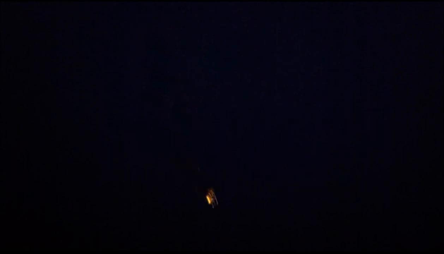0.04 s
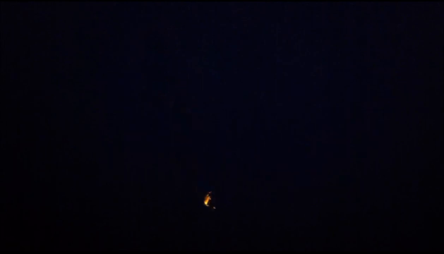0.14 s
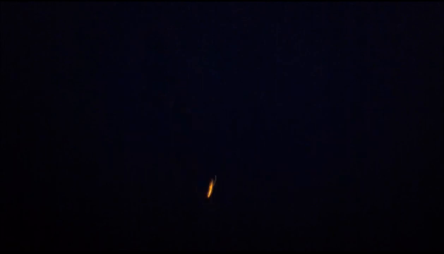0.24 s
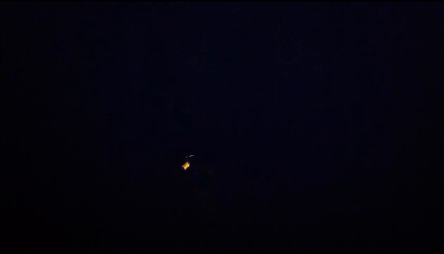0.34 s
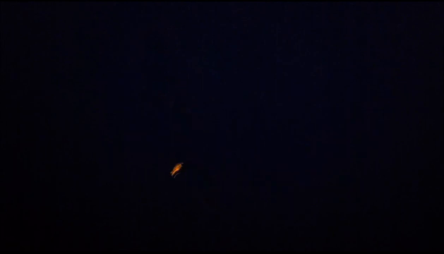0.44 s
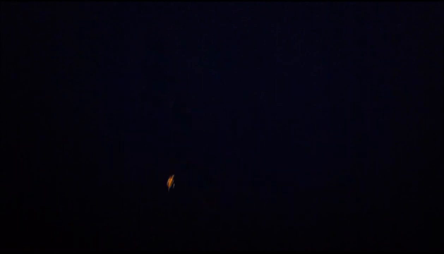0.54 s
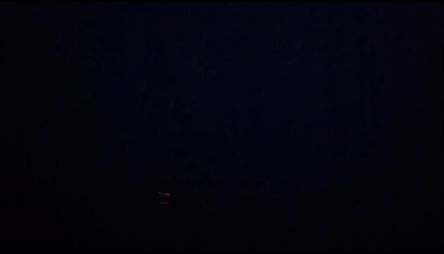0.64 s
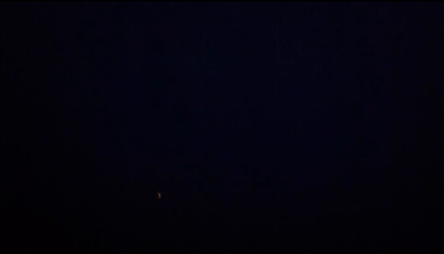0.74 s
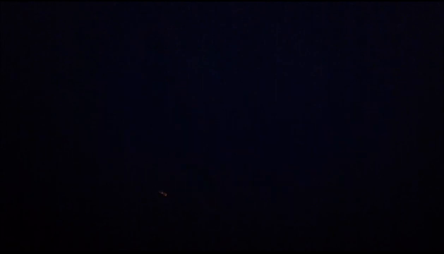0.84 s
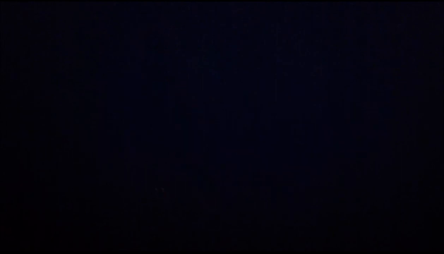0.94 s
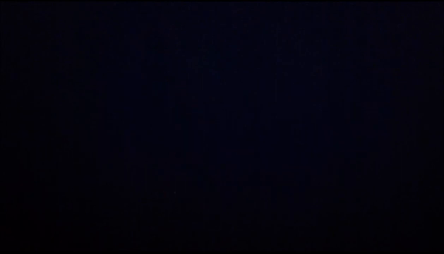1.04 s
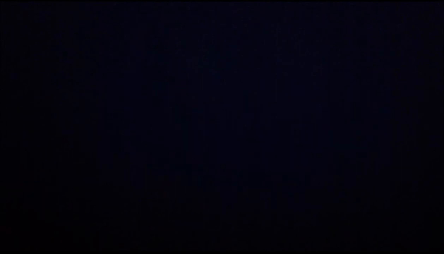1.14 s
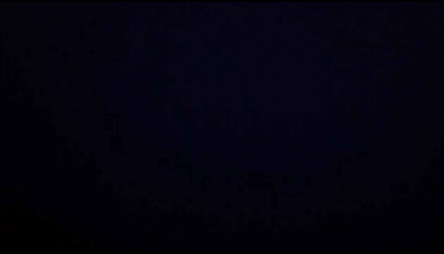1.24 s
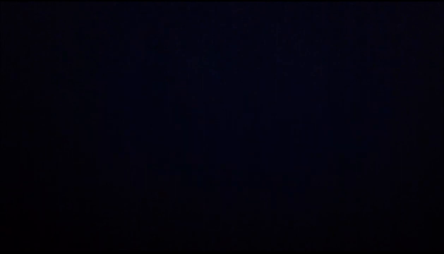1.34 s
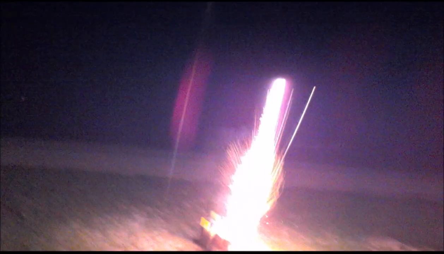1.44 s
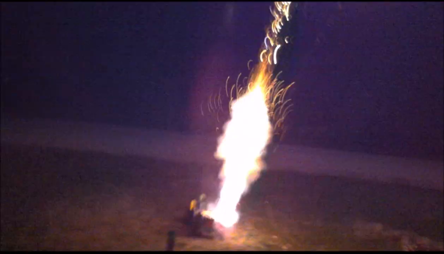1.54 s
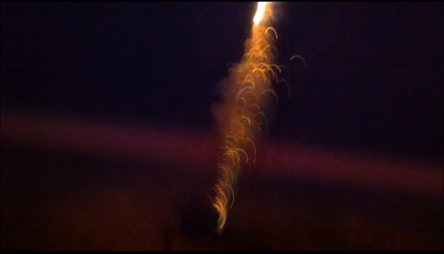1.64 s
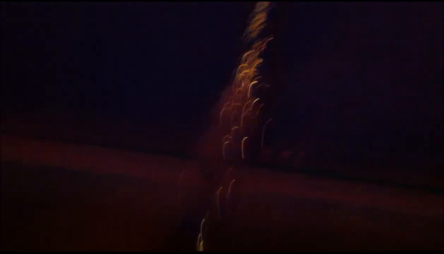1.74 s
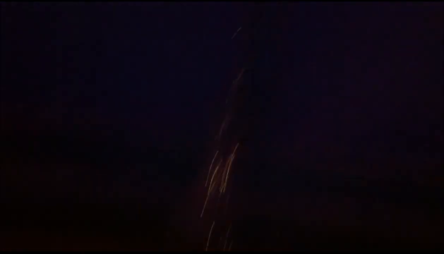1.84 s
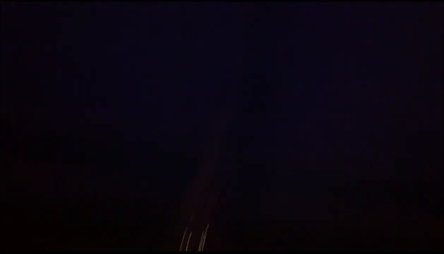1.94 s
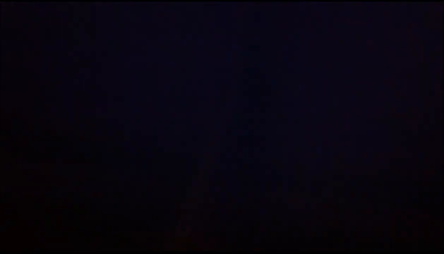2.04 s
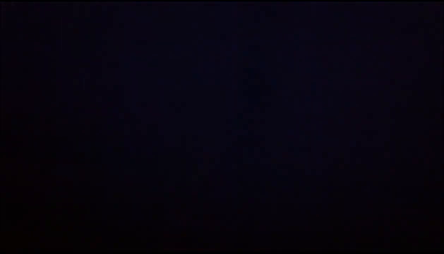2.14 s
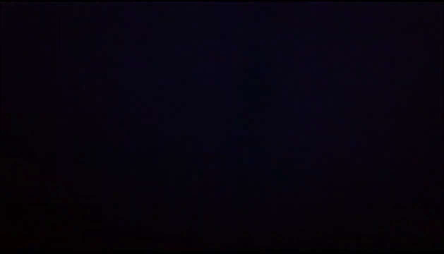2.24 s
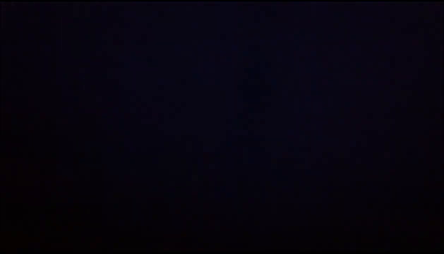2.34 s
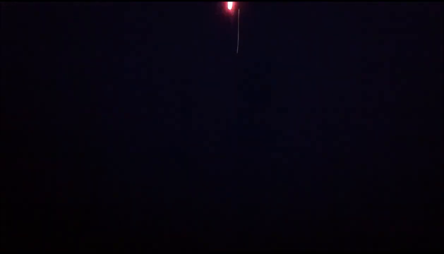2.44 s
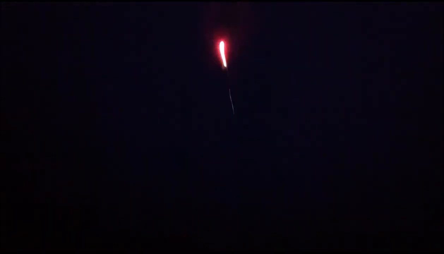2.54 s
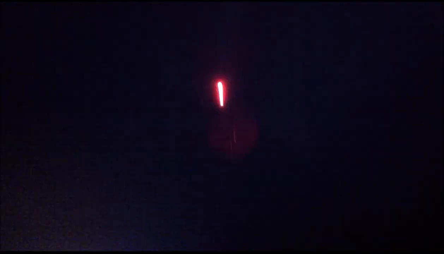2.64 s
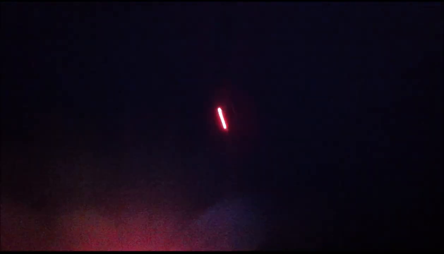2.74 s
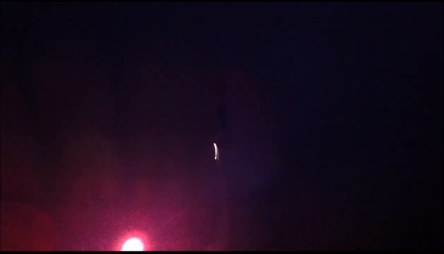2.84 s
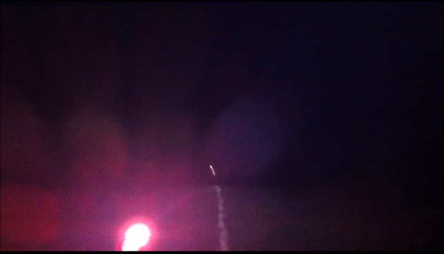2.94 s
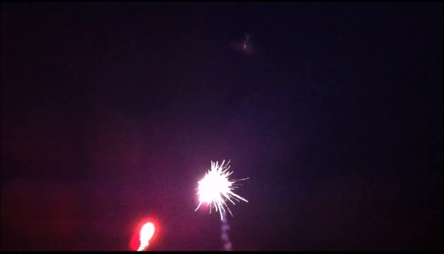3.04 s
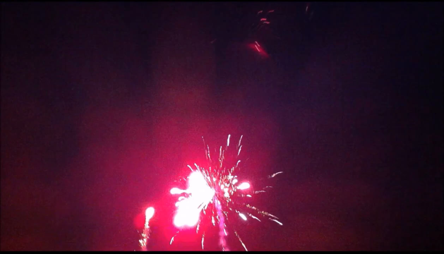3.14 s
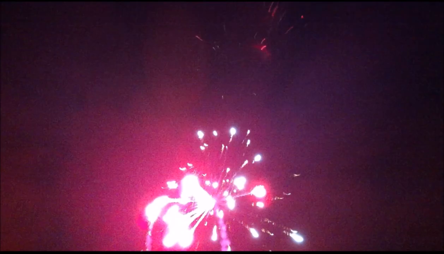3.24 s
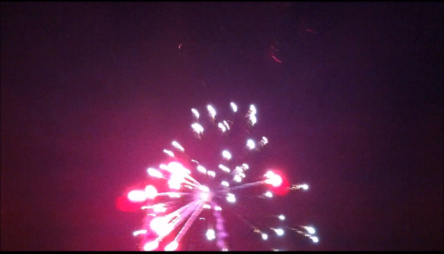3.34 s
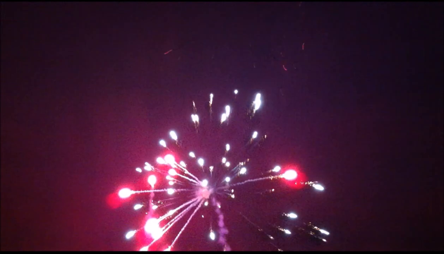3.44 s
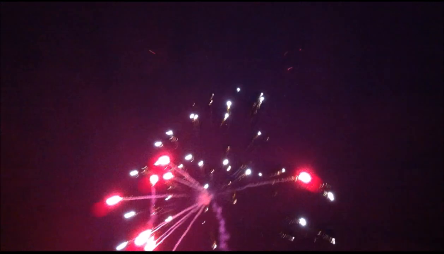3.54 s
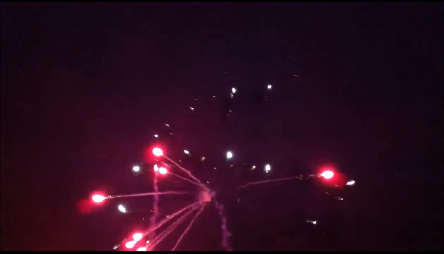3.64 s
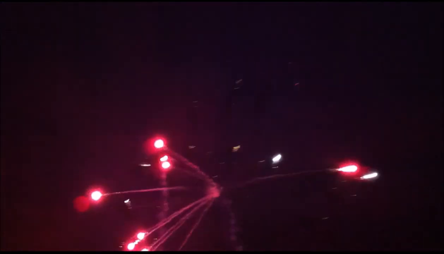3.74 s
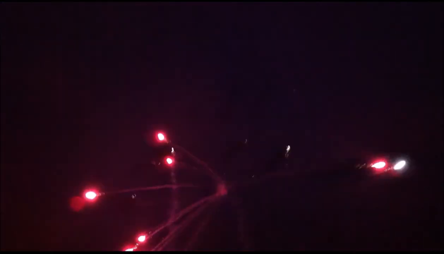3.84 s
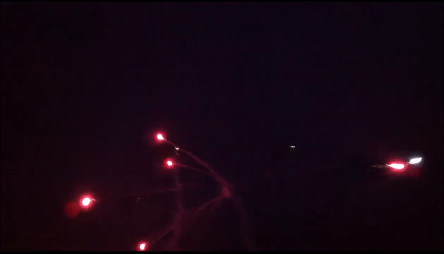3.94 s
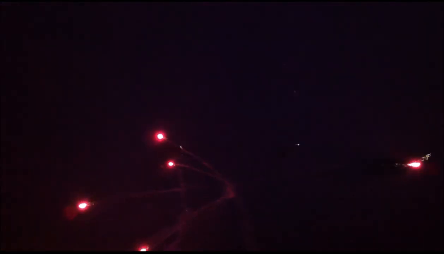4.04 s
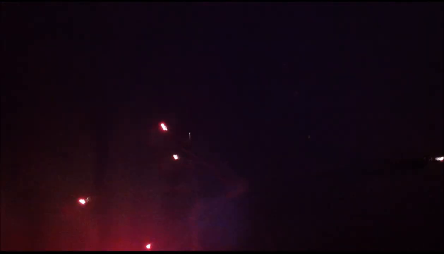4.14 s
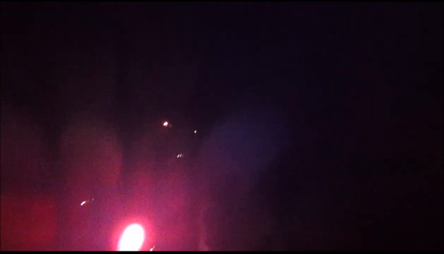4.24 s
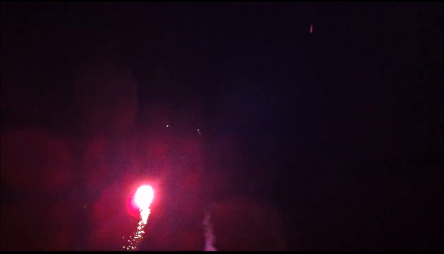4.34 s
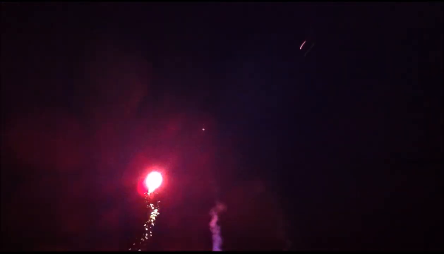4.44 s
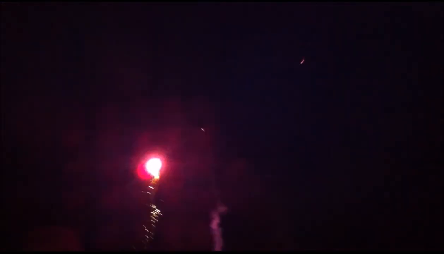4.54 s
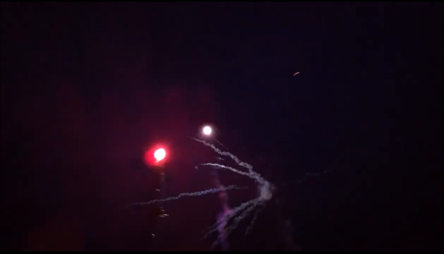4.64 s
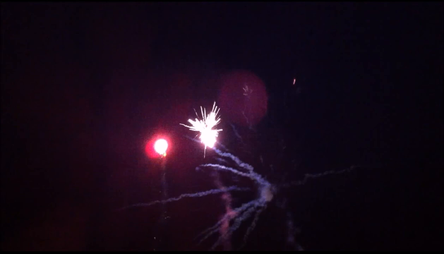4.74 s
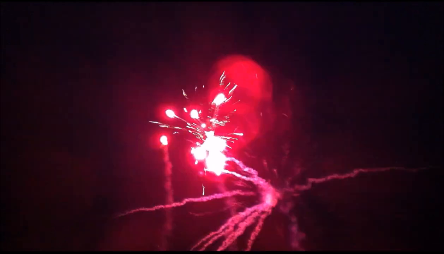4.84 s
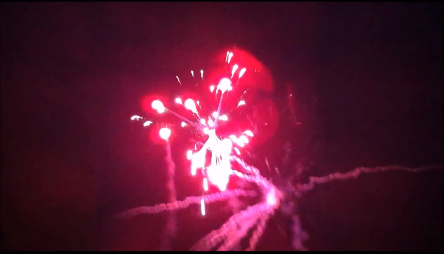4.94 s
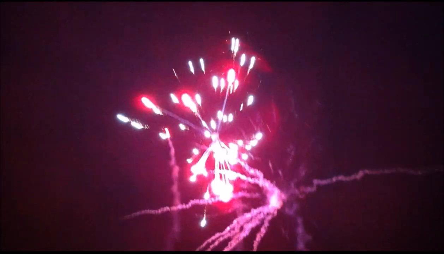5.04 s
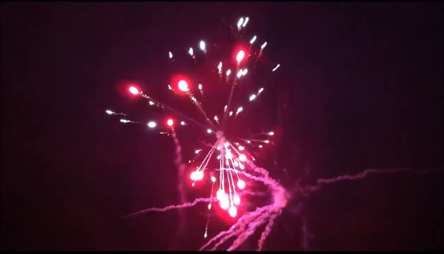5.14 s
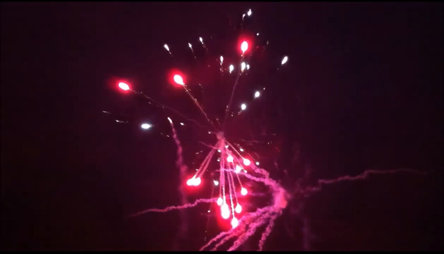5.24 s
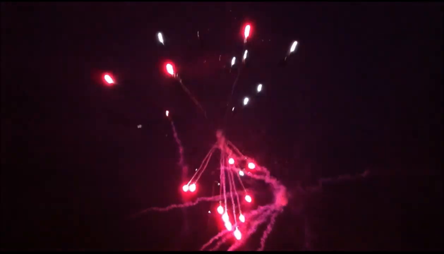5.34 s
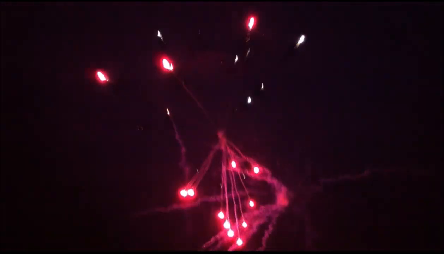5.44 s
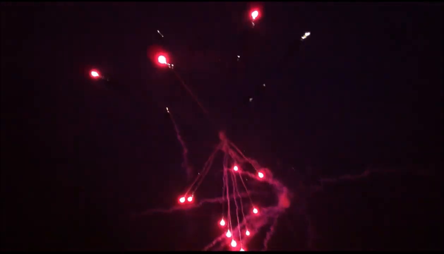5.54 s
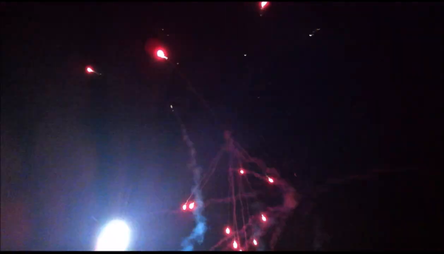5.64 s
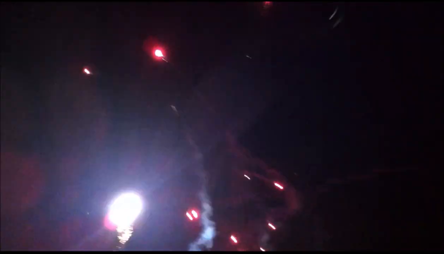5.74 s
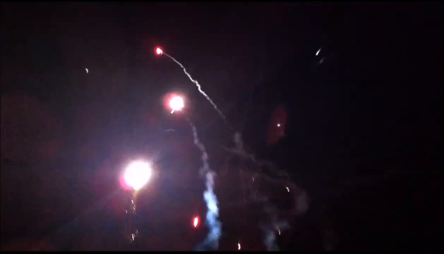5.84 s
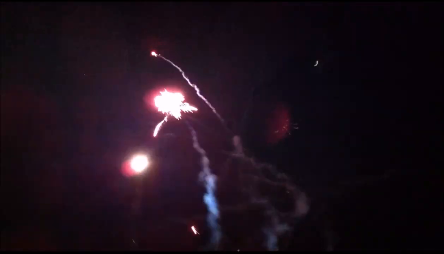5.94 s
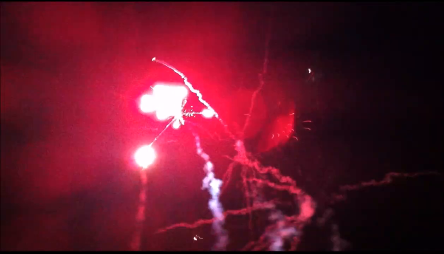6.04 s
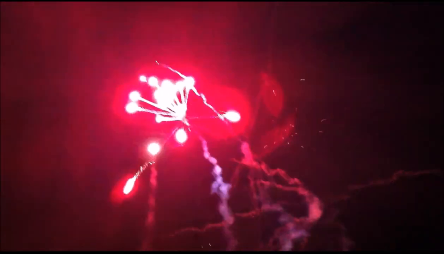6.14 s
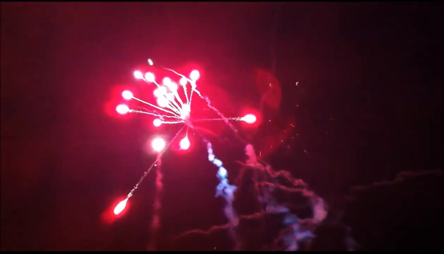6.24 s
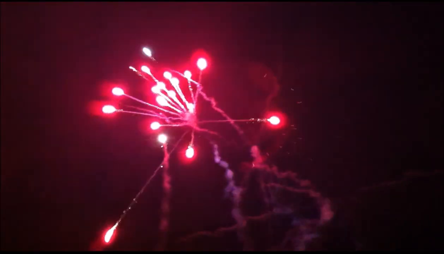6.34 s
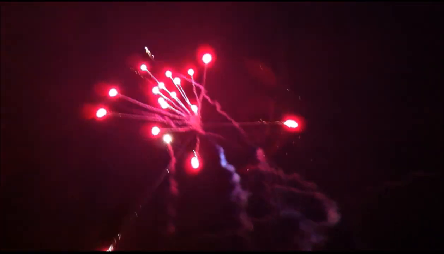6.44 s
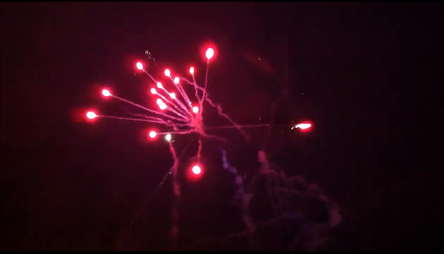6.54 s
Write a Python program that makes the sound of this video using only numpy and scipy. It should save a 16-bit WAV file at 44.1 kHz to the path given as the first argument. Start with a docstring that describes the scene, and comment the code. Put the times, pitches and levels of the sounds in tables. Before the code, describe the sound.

A faint fuse fizzes and fades over a low hiss and a few soft scuffs. Then a firework cake fires outdoors: four launch thumps with a spit of gas, and three sharp shell bursts overhead that alternate with the later launches. Nearby walls slap each bang back and the surroundings roll on. A small, close microphone loses the deep bass and overloads on the bangs.

```python
"""A faint fuse fizzes over a steady hiss and a few soft scuffs; then a firework cake fires into the night.
Four lift charges thump and spit gas out of their card tubes, and three shells burst overhead,
each bang doubled by the ground. Nearby walls slap the bangs back and the surroundings roll on.
A small microphone close by loses the deep bass and overloads on the bangs."""
import sys
import numpy as np
from scipy import signal
from scipy.io import wavfile
from scipy.ndimage import uniform_filter1d

SR = 44100
rng = np.random.default_rng(int(sys.argv[2]) if len(sys.argv) > 2 else 0)


def output_pcm(signal):
    """Save a mono or channel-first signal as 16-bit PCM at the path in sys.argv[1].

    Samples are clipped to [-1, 1] before scaling.
    """
    pcm = np.clip(np.atleast_2d(signal).T, -1, 1) * 32767
    wavfile.write(sys.argv[1], SR, np.round(pcm).astype(np.int16))


N = 290619


def amp(db):
    return np.exp(np.asarray(db) * (np.log(10) / 20))


def unit(x):
    return x / np.sqrt(np.mean(x ** 2) + 1e-20)


def clock(length):
    return np.arange(round(length * SR)) / SR


def add(mix, start_s, sound):
    part = mix[round(start_s * SR):][:len(sound)]
    part += sound[:len(part)]


def band(x, lo_hz, hi_hz, order=2):
    """Keep the part of a sound between two frequencies."""
    return signal.sosfilt(signal.butter(order, [lo_hz, hi_hz], "band", fs=SR, output="sos"), x)


def colour(x, spectrum, size=4096):
    """Give a sound a tone colour (its mix of lows and highs); white noise keeps its power."""
    hz, db = np.transpose(spectrum)
    bin_hz = abs(np.fft.fftfreq(size, 1 / SR))
    gain = amp(np.interp(np.log(bin_hz + 1), np.log(hz), db))
    response = np.exp(np.conj(signal.hilbert(np.log(gain))))  # rings only after a sound, never before
    taps = np.fft.ifft(response).real[:size // 2]
    return signal.oaconvolve(x, taps / np.linalg.norm(taps))[:len(x)]


def flicker(size, depth_db, smoothing):
    """A level that wavers at random, smoothed over some samples."""
    return amp(depth_db * unit(uniform_filter1d(rng.standard_normal(size), size=smoothing)))


def whistle(size, hz, width_hz):
    """Noise that rings around one pitch."""
    noise = rng.standard_normal(size + SR // 20)
    return unit(band(noise, hz - width_hz / 2, hz + width_hz / 2, order=1)[-size:])


def puff(length_s, hz, width_hz):
    """A breathy whistle that swells and dies away."""
    swell = np.hanning(round(length_s * SR))
    return swell * whistle(len(swell), hz, width_hz)


# tone colour of the burning fuse: f/Hz, level/dB
FUSE_COLOUR = [(300, -10), (1500, 4), (3000, -5.5), (4300, -8), (6000, -1.5), (9000, -12), (16000, -6.5)]
def fuse(first_shot_s, level_db=-50, fade_db_per_s=14.5):
    """The fuse sputters, flares once and fades as it burns into the box, until the first tube fires."""
    t = np.arange(N) / SR
    sputter = flicker(N, depth_db=1.5, smoothing=400)
    fizz = colour(rng.standard_normal(N) * sputter, FUSE_COLOUR) * amp(level_db - fade_db_per_s * t)
    add(fizz, 0.036, amp(-54) * puff(0.17, hz=5600, width_hz=1400))  # the flare
    return fizz * (t < first_shot_s)


# tone colour of the hiss: f/Hz, level/dB
HISS_COLOUR = [(30, -41), (65, -41.5), (100, -6.5), (150, 0.5), (210, -1.5), (300, -7.5), (600, -7),
               (1100, -10.5), (1900, -6.5), (3300, -14.5), (4300, -21), (6800, -10), (10800, -24),
               (15000, -13)]
# thin whines in the hiss: f/Hz, width/Hz, level/dB
WHINES = [(2257, 58, -57.5), (2100, 300, -76), (3250, 240, -65.5)]
def hiss(first_shot_s, level_db=-54, drop_db=5, drop_s=.05, sink_db_per_s=1.5):
    """A steady hiss with thin whines; it drops at the first bang and keeps sinking."""
    since = np.maximum(np.arange(N) / SR - first_shot_s, 0)
    sink_db = drop_db * np.minimum(since / drop_s, 1) + sink_db_per_s * since
    whine = sum(amp(db) * whistle(N, hz, width) for hz, width, db in WHINES)
    noise = amp(level_db) * colour(rng.standard_normal(N), HISS_COLOUR)
    return (noise + band(whine, 1500, 3500)) * amp(-sink_db)


# scuffs and bumps close by: t/s, length/s, level/dB, lowest f/Hz, highest f/Hz
SOFT_BUMPS = [(0.139, 0.21, -48, 216, 1390), (0.311, 0.02, -46.5, 300, 1240), (0.538, 0.062, -53, 91, 175),
              (0.758, 0.094, -46.5, 166, 646), (0.823, 0.021, -51, 250, 1100),
              (0.952, 0.02, -51.5, 300, 1090), (2.457, 0.075, -49, 91, 183)]
def scuffs():
    """Each soft scuff or bump is a short swell of dull noise."""
    out = np.zeros(N)
    for start, length, db, lo_hz, hi_hz in SOFT_BUMPS:
        swell = np.hanning(round(length * SR))
        noise = unit(band(rng.standard_normal(len(swell)), lo_hz, hi_hz))
        add(out, start, amp(db) * swell * noise)
    return out


# tone colour of escaping gas: f/Hz, level/dB
GAS_COLOUR = [(100, -6.5), (300, 1), (600, 0), (1100, -5), (2300, -4), (3300, -7.5), (5000, -16),
              (9000, -27.5), (16000, -27.5)]
def gas_leak(length_s=.006, level_db=-22):
    """Gas leaks past the shell just before it moves."""
    rise = np.linspace(0, 1, round(length_s * SR))
    return amp(level_db) * rise * colour(rng.standard_normal(len(rise)), GAS_COLOUR)


# notes that a strong rush of gas blows: f/Hz, width/Hz, level/dB
HOWL_NOTES = [(754, 55, -6.5), (1775, 140, -7.5)]
def gas_jet(jet_db, rise_s=0.0036, hold_s=0.0021, decay_s=0.012, spits_per_s=5000):
    """Gas sputters out of the tube and howls when the rush is strong."""
    t = clock(.12)
    flow = np.minimum(t / rise_s, 1) * np.exp(-np.maximum(t - rise_s - hold_s, 0) / decay_s)
    sputter = unit(rng.standard_normal(len(t)) * (rng.random(len(t)) < spits_per_s / SR))
    howl = sum(amp(db) * unit(flow * whistle(len(t), hz, width)) for hz, width, db in HOWL_NOTES)
    howl_db = 16 + 3.7 * jet_db  # the howl grows much faster than the rush
    return amp(jet_db) * colour(sputter * flow, GAS_COLOUR) + amp(howl_db) * flow.std() * howl


def jagged_clicks(length_s, count=13):
    """A few jolts of air pressure of random size, scattered over a moment."""
    jitter, size = rng.random((2, count, 1))
    index = np.arange(count)[:, None]
    age = clock(.008) - length_s * (index + jitter) / count
    push_pull = (size + 0.1) * (-1) ** index
    clicks = np.sum(push_pull * np.sinc(age * SR), axis=0)
    return clicks / np.linalg.norm(clicks)


# tone colour of a charge's crack: f/Hz, level/dB
CRACK_COLOUR = [(200, -19), (1200, -5.5), (2500, -2.5), (5000, -4.5), (8000, -6), (9500, -12),
                (16000, -8.5)]
def crack(length_s):
    """Tightly packed clicks blend into one ragged crack."""
    return np.sqrt(length_s * SR) * colour(jagged_clicks(length_s), CRACK_COLOUR)


# notes of the air in a tube: f/Hz, level/dB, time to fade by 60 dB/s
TUBE_NOTES = [(166.5, -13.5, 0.036), (256.3, -12.5, 0.071), (331, -6, 0.033), (615, -12.5, 0.056)]
def thump(delay_s):
    """The air in the tube rings once the shell has left its mouth."""
    age = np.maximum(clock(.2) - delay_s, 0)
    return sum(amp(db - 60 * age / ring_s) * np.sin(2 * np.pi * hz * age)
               for hz, db, ring_s in TUBE_NOTES)


def fade(t, rise_s, db, fall_db_per_s):
    """A level that rises quickly and then loses the same dB every second."""
    return np.minimum(t / rise_s, 1) * amp(db - fall_db_per_s * t)


def echo_wash(t, spectrum, air_db_per_s, air_curve, flutter_db, raggedness):
    """Countless small echoes, duller the further they travel; air_db_per_s is the loss at 10 kHz."""
    flutter = flicker(len(t), flutter_db, smoothing=160)
    echoes = unit(rng.standard_normal(len(t)) * flutter)
    ragged = signal.oaconvolve(echoes, jagged_clicks(0.0026))[:len(t)]
    echoes += raggedness * np.exp(-t / 0.059) * ragged  # early echoes keep the bang's ragged colour
    hz, delay, slices = signal.stft(echoes, SR, nperseg=256)
    patches = uniform_filter1d(rng.standard_normal(slices.shape), size=12, axis=1)
    patches = unit(uniform_filter1d(patches, size=2, axis=0))  # louder and softer spots in time and pitch
    uneven_db = 2.2 * patches / (1 + hz[:, None] / 4000)
    air_loss_db = air_db_per_s * (hz[:, None] / 1e4) ** air_curve * delay
    _, dulled = signal.istft(slices * amp(uneven_db - air_loss_db), SR, nperseg=256)
    return colour(dulled[:len(t)], spectrum)


# tone colour of the roll after a launch: f/Hz, level/dB
LAUNCH_ROLL_COLOUR = [(40, -4), (90, -13), (135, -3), (260, -5), (450, -1.5), (720, -1), (980, -3),
                      (1400, -1.5), (1900, 1), (3100, 0), (5000, -3.5), (7500, -8.5), (10000, -12),
                      (15000, -14)]
def launch_roll(bank_delay_s=0.12, bank_rise_db_per_s=226, bank_fall_db_per_s=117):
    """A launch scatters off things close by, swells back off a bank of trees or houses and rolls on."""
    t = clock(1.7)
    close = fade(t, rise_s=0.017, db=22, fall_db_per_s=1599.5)
    late = t - bank_delay_s
    bank = amp(-1 - np.maximum(-late * bank_rise_db_per_s, late * bank_fall_db_per_s))
    distant = fade(t, rise_s=0.036, db=-6, fall_db_per_s=16)
    wash = echo_wash(t, LAUNCH_ROLL_COLOUR, air_db_per_s=46, air_curve=0.77,
                     flutter_db=1.0, raggedness=0.45)
    return wash * np.sqrt(close ** 2 + bank ** 2 + distant ** 2)


# lift charges: t/s, thump level/dB, thump delay/s, crack level/dB, gas level/dB,
# near slap level/dB, its ring f/Hz, far slap level/dB, roll level/dB
LIFT_CHARGES = [(1.5791, -2.5, 0.011, -28, -4, -16.5, 2500, -27.5, -28.5),
                (2.6604, 0.5, 0.004, -12, -9, -24, 3750, -21, -27.5),
                (4.0201, 0.5, 0.00237, -11, -10.5, -22, 5400, -13.5, -27),
                (5.4938, -3, 0.0015, -6, -14.5, -23, 3370, -15.5, -25)]
# walls that slap the crack back: delay/s, extra level/dB, lowest f/Hz, highest f/Hz, far (1) or near (0)
CRACK_WALLS = [(.0215, 1, 1800, 14000, 0), (.049, -6, 1200, 6000, 1), (.0525, 0, 1800, 6000, 1),
               (.057, -2, 1800, 5000, 1)]
# walls that send the thump back: delay/s, extra level/dB
THUMP_WALLS = [(.026, -12.5), (.047, -12), (.068, -18.5), (.118, -23.5), (.151, -24), (.202, -30)]
def launches():
    """Each charge shoots a shell out of its tube, and the surroundings answer."""
    out = np.zeros(N)
    for start, thump_db, thump_delay, crack_db, jet_db, near_db, ring_hz, far_db, roll_db in LIFT_CHARGES:
        leak = gas_leak()
        add(out, start - len(leak) / SR, leak)
        add(out, start, amp(crack_db) * crack(0.0022))
        add(out, start, gas_jet(jet_db))
        boom = amp(thump_db) * thump(thump_delay)
        add(out, start, boom)
        zing = puff(0.0066, ring_hz, width_hz=0.15 * ring_hz)  # the near slap's short, rough ring
        add(out, start + .0205, amp(near_db + 1.5) * zing)
        for delay, db, lo_hz, hi_hz, is_far in CRACK_WALLS:
            slap = band(crack(.003), lo_hz, hi_hz, order=1)
            add(out, start + delay, amp(db + (far_db if is_far else near_db)) * slap)
        for delay, db in THUMP_WALLS:
            add(out, start + delay, amp(db) * band(boom, 210, 620))
        add(out, start, amp(roll_db) * launch_roll())
    return out


def shock(push_s, suction_s, edge_s):
    """A jump of air pressure that swings over into a fading suction."""
    t = clock(.05)
    return np.tanh((push_s - t) / edge_s) * np.exp(-np.maximum(t - push_s, 0) / suction_s)


# tone colour of the roll after a burst: f/Hz, level/dB
BURST_ROLL_COLOUR = [(40, -11), (90, -16), (150, -7.5), (450, 4.5), (900, 3), (1400, 1.5), (2200, 2.5),
                     (3500, -2.5), (6500, -9), (8000, -12), (10200, -18), (13000, -16), (16000, -23)]
def burst_roll():
    """A burst scatters off things close by; from the sky it reaches far and rolls longer."""
    t = clock(1.7)
    close = fade(t, rise_s=0.017, db=24.5, fall_db_per_s=1599.5)
    distant = fade(t, rise_s=0.036, db=-2, fall_db_per_s=13)
    wash = echo_wash(t, BURST_ROLL_COLOUR, air_db_per_s=37.5, air_curve=0.76,
                     flutter_db=0.5, raggedness=0.64)
    return wash * np.hypot(close, distant)


# bursting shells: t/s, shock level/dB, push length/s, ground level/dB, wall level/dB, roll level/dB
SHELLS = [(3.2534, 3, 0.000029, 7.5, -2.5, -25.5), (4.9958, -1, .00023, 1, -18, -35.5),
          (6.16, 3, 0.000064, 4, -13.5, -31)]
# walls that send a burst's low thud back: delay/s, extra level/dB, lowest f/Hz, highest f/Hz
THUD_WALLS = [(0.0105, -4, 336, 680), (0.0438, -2.5, 254, 430), (.05, -5.5, 250, 400)]
# far slopes that answer a burst: delay/s, level added to the roll's/dB
FAR_SLOPES = [(1.475, -27.5), (1.552, -24), (1.665, -21.5)]
def bursts(ground_delay_s=.0114, far_length_s=.085):
    """Each shell bangs overhead; the ground, the walls and far slopes send back duller echoes."""
    out = np.zeros(N)
    for start, shock_db, push_s, ground_db, wall_db, roll_db in SHELLS:
        front = shock(push_s, suction_s=0.00098, edge_s=.00004)
        bounce = shock(0.00043, suction_s=0.00044, edge_s=0.00059)  # soft ground stretches the front
        bang = amp(shock_db) * front
        add(bang, ground_delay_s, amp(ground_db) * band(bounce, 72, 5500, order=1))
        add(out, start, band(bang, 135, 11000, order=1))
        for delay, db, lo_hz, hi_hz in THUD_WALLS:
            add(out, start + delay, amp(wall_db + db) * band(front, lo_hz, hi_hz))
        add(out, start, amp(roll_db) * burst_roll())
        for delay, db in FAR_SLOPES:
            answer = puff(far_length_s, hz=467.5, width_hz=110)
            add(out, start + delay - far_length_s / 2, amp(roll_db + db) * answer)
    return out


def microphone(x, cutoff_hz=165, damping=0.84):
    """A small microphone loses the deep bass and rings a little near its cutoff."""
    w = 2 * np.pi * cutoff_hz
    return signal.lfilter(*signal.bilinear([1, 0, 0], [1, damping * w, w * w], SR), x)


def scene():
    """The bangs as the microphone takes them, over the quiet sounds, in one channel."""
    first_shot_s = LIFT_CHARGES[0][0]
    bangs = microphone(launches() + bursts())
    return (bangs + scuffs() + hiss(first_shot_s) + fuse(first_shot_s))[None]


def record(dry, threshold_db=-9, react_s=0.0057, recovery_db_per_s=65, highest_hz=16100):
    """The volume ducks after the loudest bangs, overload rounds the peaks and the top treble is cut."""
    memory = np.exp(-1 / (react_s * SR))
    power_db = 10 * np.log10(signal.lfilter([1 - memory], [1, -memory], dry[0] ** 2) + 1e-12)
    recovery_db = recovery_db_per_s * np.arange(N) / SR
    held_db = np.maximum.accumulate(power_db + recovery_db) - recovery_db  # each peak sinks steadily
    ducked = dry / amp(np.maximum(held_db - threshold_db, 0))
    rounded = ducked / (1 + ducked ** 6) ** (1 / 6)
    treble_cut = signal.firwin(401, highest_hz, window=("kaiser", 8), fs=SR)
    return signal.oaconvolve(rounded, treble_cut[None], "same")


dry = scene()
out = record(dry)
output_pcm(out)
```